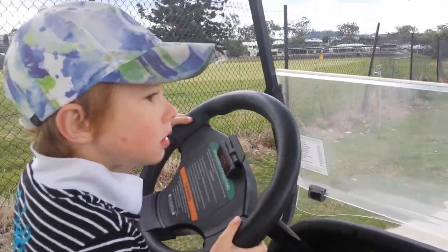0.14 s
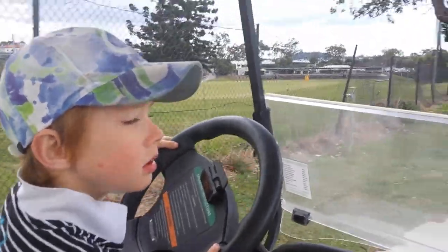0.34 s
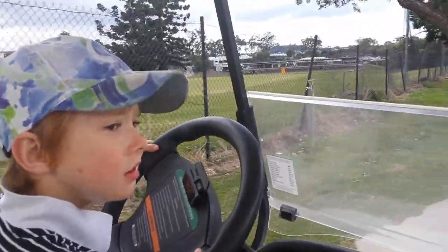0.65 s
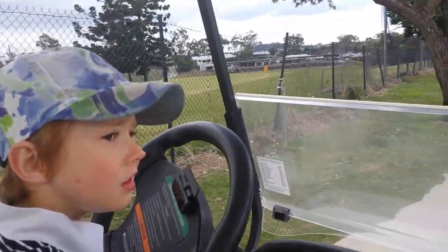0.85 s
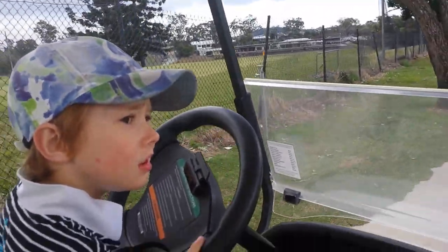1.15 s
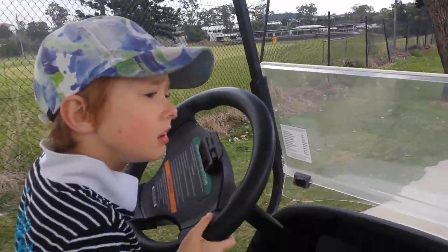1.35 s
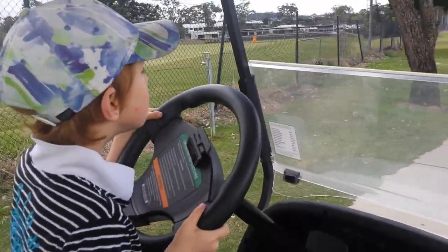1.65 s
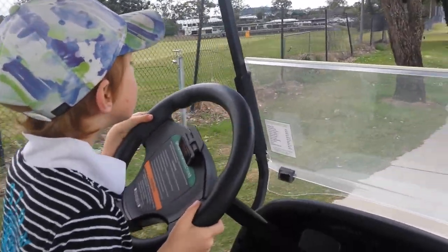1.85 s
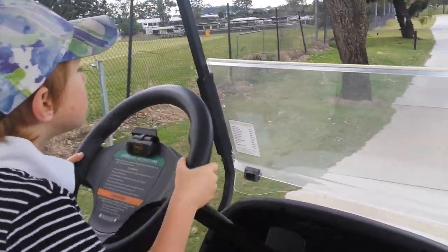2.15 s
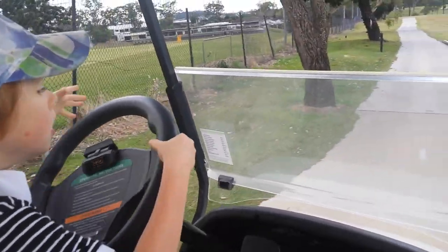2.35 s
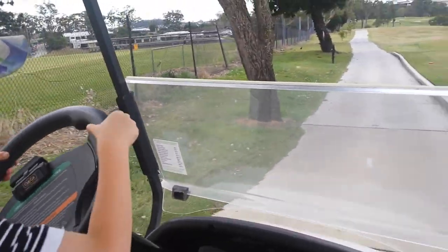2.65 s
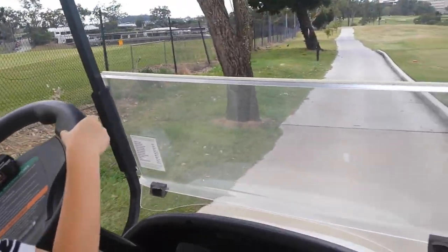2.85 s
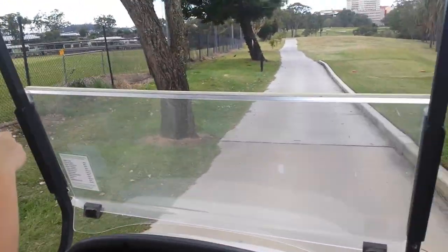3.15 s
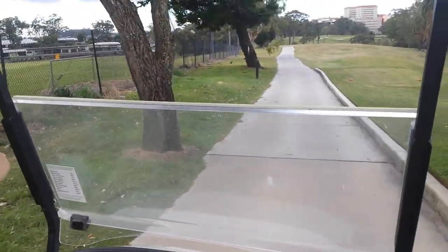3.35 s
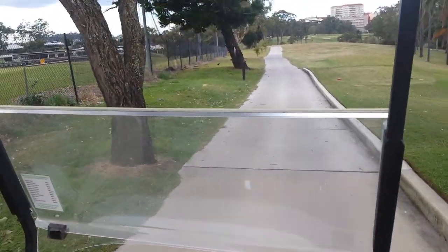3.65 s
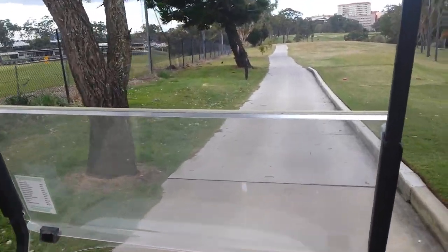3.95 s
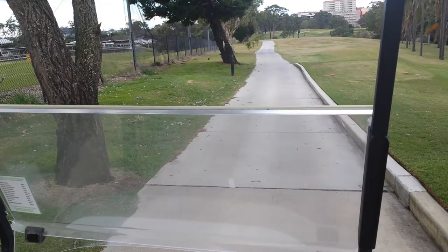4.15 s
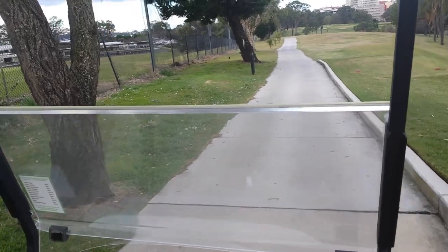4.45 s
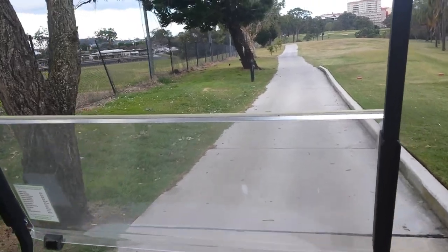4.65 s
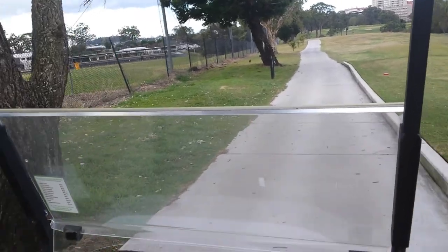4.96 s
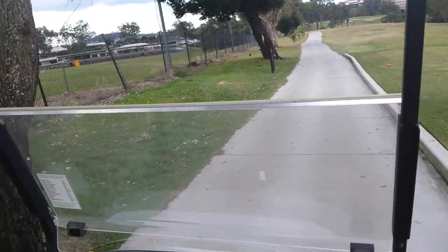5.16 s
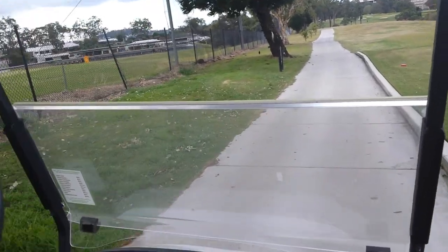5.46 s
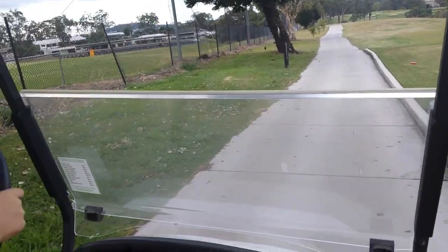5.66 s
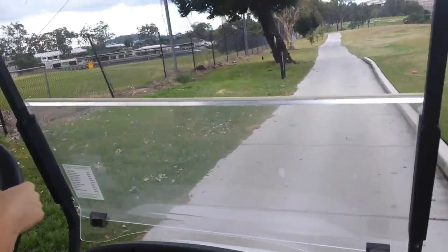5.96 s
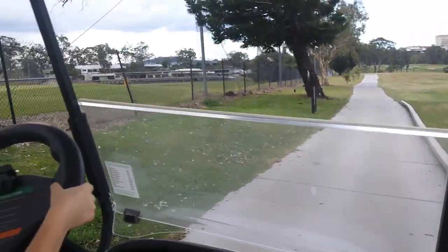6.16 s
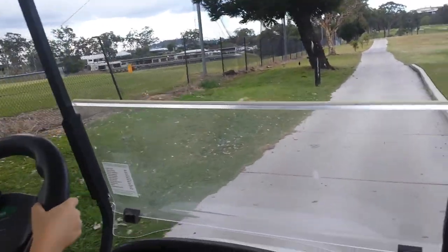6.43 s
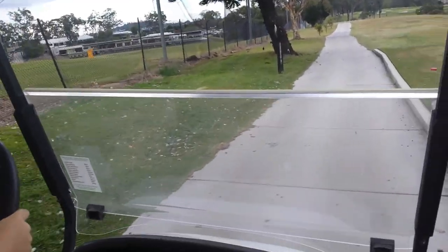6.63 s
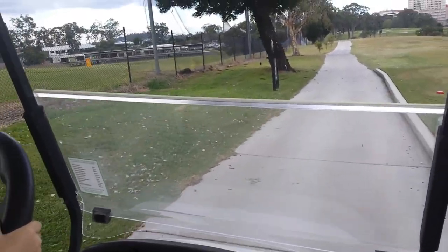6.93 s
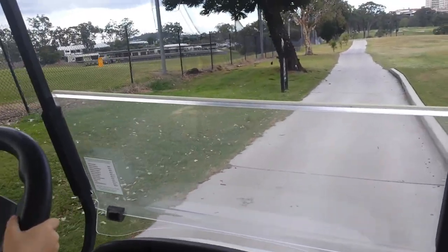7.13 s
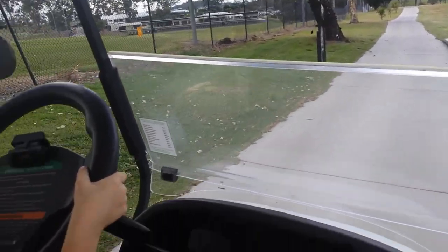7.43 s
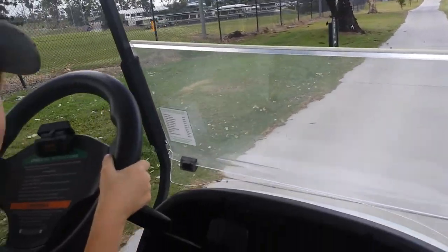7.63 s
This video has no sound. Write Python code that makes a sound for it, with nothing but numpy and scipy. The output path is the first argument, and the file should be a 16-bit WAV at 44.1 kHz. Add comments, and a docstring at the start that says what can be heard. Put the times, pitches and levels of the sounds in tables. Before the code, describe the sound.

A small golf cart rolls on a concrete path, heard from the seat outdoors. Low chassis rumble, light tyre hiss and a faint wavering whine continue throughout. From 0 to 2.1 s wind buffets heavily, mainly on the left, with blunt pops; a dry snap comes at 0.2 s, small clinks and a tiny squeak around 0.5 s, and woody panel knocks near 1.5 and 1.6 s. Around 2.5 to 2.7 s more knocks and a snap follow. A thin rubbing drive tone grows from 3 s, chirping at 4.2 and 4.7 to 4.9 s, between short gusts. It strengthens at 5.4 s. From 5.75 to 6.15 s the motor surges: quick dull beats climb into a hum, with louder hiss, ringing body, clinks and clatter. Sharp snaps land at 6.55 and 6.67 s. The motor then slows and eases, rumble remaining, with renewed wind around 7.2 to 7.5 s.

```python
"""On a concrete path, a small golf cart rolls along, heard from the seat.
Noise through low resonances makes the rumble, and noise bands make the hiss of tyres and drive.
Wavering tones make the whine of the drive, which also rubs in step with its turning; gusts buffet each microphone port.
Short blows make snaps, clinks and the knocks of a loose panel, and small trim squeaks.
A surge of the motor swells into a rising hum and makes small parts clatter."""
import sys
import numpy as np
from scipy import signal
from scipy.io import wavfile

SR = 44100
rng = np.random.default_rng(int(sys.argv[2]) if len(sys.argv) > 2 else 0)


def unload_audio(sound):
    """Save the sound as a 16-bit wav file, at the path given as the first command line argument."""
    columns = np.transpose(np.atleast_2d(sound))
    # keep every value between -1 and 1, then stretch to whole-number steps
    steps = np.round(np.clip(columns, -1, 1) * 32767)
    wavfile.write(sys.argv[1], SR, steps.astype(np.int16))


N = 343539  # length in samples
TIME = np.arange(N) / SR

# How strong the motor's beats are. Each row: time in seconds, level in dB.
BEAT_LEVELS = [(5.7, -27.5), (5.77, -9.5), (6.12, -11.5), (6.25, -20), (7, -28)]
# Resonances of the motor housing. Each row: pitch in Hz, width in Hz, relative level in dB.
HOUSING_MODES = [(1506, 28, 10), (1586, 23, 11), (1736, 65, 2), (3015, 26, 0.5)]
CHIRP_S = 0.023  # length of a chirp or squeak, in seconds at half height


def from_db(db):
    """Turn decibels into a gain."""
    return 10 ** (np.asarray(db) / 20)


def rms_one(x):
    """Scale a signal to unit power."""
    return x / np.sqrt(np.mean(x ** 2) + 1e-20)


def in_time(rows):
    """Read each column of a curve at every sample."""
    s, *columns = np.transpose(rows)
    return [np.interp(TIME, s, c) for c in columns]


def pan(left_db):
    """Gains of the two channels for a given left-minus-right level."""
    return from_db(np.array([[.5], [-.5]]) * left_db)


def drift(rate):
    """Smooth random curve of spread 1 that changes about rate times a second."""
    r = np.exp(-80 * np.pi * rate / SR)
    # one point every 40 samples; the first 2000 let the filter settle
    points = rng.standard_normal(N // 40 + 2002)
    slow = signal.lfilter([1], [1, -2 * r, r * r], points)[2000:]
    return np.interp(np.arange(N) / 40, np.arange(len(slow)), rms_one(slow))


def stereo_noise(alike):
    """White noise, partly shared by both channels."""
    share = np.clip(alike, 0, 1)
    common = np.sqrt(share) * rng.standard_normal(N)
    return common + np.sqrt(1 - share) * rng.standard_normal((2, N))


def bands(spectrum, alike):
    """Half-octave stereo bands (centre Hz, noise) that add up to a spectrum of unit power."""
    hz, level_db = np.transpose(spectrum)
    centres = 25 * 2 ** np.arange(0, 9.6, .5)
    centres = centres[(centres > hz[0] / np.sqrt(2)) & (centres < hz[-1] * np.sqrt(2))]
    gains = from_db(np.interp(np.log(centres), np.log(hz), level_db))
    # neighbouring bands take turns between two independent noises
    white = [stereo_noise(alike), stereo_noise(alike)]
    edges = np.sqrt(np.sqrt([.5, 2]))
    parts = []
    for k, (centre, gain) in enumerate(zip(centres, gains)):
        band = signal.butter(2, centre * edges, "band", fs=SR, output="sos")
        parts.append(gain * signal.sosfilt(band, white[k % 2]))
    total = np.std(sum(parts))
    return [(centre, part / total) for centre, part in zip(centres, parts)]


def resonate(force, modes):
    """Parallel resonances driven by a force, scaled to unit power; wider ones die sooner."""
    out = 0
    for k, (hz, width, db) in enumerate(modes):
        r = np.exp(-np.pi * width / SR)
        b = (1 - r * r) / 2 * np.array([1, 0, -1])
        a = [1, -2 * r * np.cos(2 * np.pi * hz / SR), r * r]
        out = out + (-1) ** k * from_db(db) * signal.lfilter(b, a, force)
    return rms_one(out)


def ring(clicks, hz, t60):
    """A unit click starts a sine of height 1 that fades by 60 dB in t60 seconds."""
    r = from_db(-60 / (t60 * SR))
    w = 2 * np.pi * hz / SR
    return signal.lfilter([0, np.sin(w)], [1, -2 * r * np.cos(w), r * r], clicks + 1e-18)


def contacts(times, strengths, chatter, chatter_s):
    """Each blow is one sharp contact and a dying chatter of smaller ones."""
    out = np.zeros((2, N))
    age = TIME[:SR // 10]
    for s, strength in zip(times, strengths):
        blow = chatter * rng.standard_normal((2, len(age))) * np.exp(-age / chatter_s)
        blow[:, 0] = 1
        at = round(s * SR)
        out[:, at:at + len(age)] += strength * blow[:, :N - at]
    return out


def suction(t, width_s):
    """Pressure under an eddy whose centre passes at t = 0: a dip between two rises."""
    across = (t / width_s) ** 2
    return (across - 1) * np.exp(-across / 2)


def swell(s, length_s, steepness):
    """A smooth rise to 1 at time s and back; length_s is its width at half height."""
    distance = np.minimum(np.abs(2 * (TIME - s) / length_s), 6)
    return np.exp(-distance ** steepness * np.log(2))


def from_left(x, left_db, lag_s):
    """A source on the left is louder there and reaches the right port later."""
    return np.array([x[0], np.interp(TIME - lag_s, TIME, x[1])]) * pan(left_db)


def tyres(rumble_db, boom_db, broad_db, jolt_db):
    """Bumps in the concrete shake the chassis, which booms on its low resonances."""
    # Tyres and chassis. Each row: pitch in Hz, width in Hz, relative level in dB.
    chassis = [(79.7, 20.6, 0.5), (113.5, 28.6, 0.5), (183, 31, -5.5), (251, 14.7, -3), (426.6, 73, -11.5)]
    # Spectrum of the rumble. Each row: pitch in Hz, relative level in dB per Hz.
    rumble = [(25, -3), (80, 15), (130, 4), (250, -4.5), (400, -7), (700, -5), (2500, -46)]
    boom = from_db(boom_db) * resonate(stereo_noise(alike=0.74), chassis)
    broad = from_db(broad_db) * sum(noise for hz, noise in bands(rumble, alike=0.72))
    dull = signal.butter(2, 900, fs=SR, output="sos")
    return (signal.sosfilt(dull, boom) + broad) * from_db(rumble_db + jolt_db * drift(3.5))


def motor(turns, lead_turns, lead_db, width_s, hum_db):
    """Two dull, nearly equal beats each turn set the motor bay humming; the hum climbs with the speed."""
    # The motor bay. Each row: pitch in Hz, width in Hz, relative level in dB.
    motor_bay = [(108, 18, 0), (445, 45, -6), (188, 16, -3.5)]
    # one beat whenever the count of whole turns goes up
    main, lead = (np.diff(np.floor(t), prepend=np.floor(t[0])) for t in (turns, turns + lead_turns))
    beats = main + from_db(lead_db) * lead
    puffs = signal.fftconvolve(beats, suction(TIME[:SR // 50] - .01, width_s), "same")
    dull = signal.butter(2, 1200, fs=SR, output="sos")
    hum = signal.sosfilt(dull, resonate(beats, motor_bay))
    return (puffs - from_db(hum_db) * hum) * from_db(in_time(BEAT_LEVELS)[0])


def hiss(hiss_db, grain_db, flutter_db, low_left_db, high_left_db):
    """Tyres and drive hiss together, unsteadily; the highest hiss comes from the open right side."""
    # Spectrum of the hiss. Each row: pitch in Hz, relative level in dB per Hz.
    hiss_spectrum = [(300, -8), (900, 14.5), (1300, 2.5), (2300, 5.5), (4200, -8.5), (6000, -12.5),
                     (8000, -8.5), (14000, -22.5)]
    grain = from_db(hiss_db + grain_db * drift(76))
    out = 0
    for hz, noise in bands(hiss_spectrum, alike=0.0089):
        side_db = np.interp(hz, [2000, 4000], [low_left_db, high_left_db])
        out = out + noise * pan(side_db) * from_db(flutter_db * drift(17.3))
    return grain * out


def body(body_db):
    """Road and gears, as one steady noise, keep the body ringing on its resonances."""
    # Roof, screen and axle housing. Each row: pitch in Hz, width in Hz, relative level in dB.
    body_modes = [(430, 230, 3.5), (622, 95, 6), (755, 22, 11.5), (848, 70, 10), (1650, 270, -0.5)]
    return resonate(stereo_noise(alike=0.75), body_modes) * from_db(body_db)


def gears(turns, load_db, waver, swell_db, throb, lag_rad):
    """Gear tones waver in pitch, shift with load, swell and fade, and throb once a turn."""
    # Whine of the gears. Each row: pitch in Hz, level in dB, dB gained per dB of load,
    # Hz gained per dB of load.
    whine = [(826, -43, -0.12, 0), (993, -43.5, -0.34, -0.5), (1069, -46, 0.0244, -1.5)]
    pace = 1 + waver * drift(2.062)
    out = 0
    for hz, db, db_per_load, hz_per_load in whine:
        angle = 2 * np.pi * np.cumsum((hz + hz_per_load * load_db) * pace) / SR
        # one swell shared by both sides, one for each side alone
        swelling = drift(37.0) + np.array([drift(11), drift(22)])
        gain = from_db(db + db_per_load * load_db + swell_db * swelling)
        out = out + gain * np.sin(angle + drift(12) - np.array([[0], [lag_rad]]))
    return out * (1 + throb * np.cos(2 * np.pi * turns))


def housing(turns, level_db, burst_db):
    """Small contacts crowd into a burst of strength once a turn and rattle the motor housing."""
    grains = (rng.random(N) < 900 / SR) * stereo_noise(alike=0.27)  # about 900 contacts a second
    force = grains * from_db(burst_db * np.cos(2 * np.pi * turns))
    return resonate(force, HOUSING_MODES) * from_db(level_db)


def drive(turns, level_db, twice_db):
    """A turning part rubs twice a turn, unevenly, and sings on one wavering pitch; now and then it catches."""
    # The part catches and chirps. Each row: middle in seconds, extra level in dB.
    chirps = [(4.21, 9), (4.51, -2), (4.73, 9), (4.805, -6), (4.88, 1), (5.405, -8)]
    rub_hz, jitter_rad = 2156, .85
    uneven_db = 3.5 * drift(22)
    pressure = from_db(twice_db * np.cos(4 * np.pi * turns) + uneven_db)
    catches = sum(from_db(db) * swell(s, CHIRP_S, 3.9) for s, db in chirps)
    wander = jitter_rad * drift(52) + 2 * drift(7)
    song = rms_one(np.sin(2 * np.pi * rub_hz * TIME + wander))
    return song * (rms_one(pressure) + catches) * from_db(level_db)


def clatter(effort_db, level_db, ring_db):
    """Loose parts jump and land unevenly, harder with effort: dry clacks that also ring the housing."""
    s, luck = rng.random((600, 2)).T
    s = s * TIME[-1]
    shaking_db = np.interp(s, TIME, effort_db + in_time(BEAT_LEVELS)[0])
    # cubing makes most landings weak and a few strong
    blows = contacts(s, luck ** 3 * from_db(shaking_db), chatter=0.38, chatter_s=0.0038)
    middle = signal.butter(1, [1400, 3500], "band", fs=SR, output="sos")
    clacks = rms_one(signal.sosfilt(middle, blows))
    return from_db(level_db) * (clacks + from_db(ring_db) * resonate(blows, HOUSING_MODES))


def airflow():
    """Buffeting in dB at each port: the powers of breeze and gusts add."""
    # The longer-lasting airflow. Each row: time in seconds, left level in dB, right level in dB.
    breeze = [(0, -14, -28), (.6, -13.5, -40), (.8, -18.5, -40), (1.2, -16.5, -25), (1.55, -11.5, -41),
              (2.05, -16, -29), (2.2, -28, -46), (4.7, -40, -25), (5.8, -55, -30), (6.17, -10.5, -31),
              (6.55, -18, -21), (6.66, -45, -30), (7.05, -30, -24), (7.2, -15.5, -16), (7.45, -11.5, -29),
              (7.52, -28, -25)]
    # Short gusts on top. Each row: middle in seconds, length in seconds, left level in dB,
    # right level in dB.
    gusts = [(0.177, 0.055, -12, -21), (2.68, 0.037, -20.5, -31.5), (2.824, 0.034, -15, -34),
             (3.085, 0.12, -16.5, -31), (3.363, 0.13, -17, -46), (3.496, 0.06, -16.5, -19),
             (4.339, 0.07, -13, -27), (4.801, 0.035, -23, -17), (4.914, 0.049, -14, -24),
             (5.053, 0.047, -37, -15.5), (5.721, 0.052, -13, -23), (6.24, 0.048, -29, -10),
             (6.424, 0.03, -13, -50), (6.777, 0.049, -16.5, -17.5), (7.086, 0.043, -29, -13.5),
             (7.741, 0.065, -38, -15.5)]
    power = from_db(in_time(breeze)) ** 2
    for s, length_s, left_db, right_db in gusts:
        peak = from_db([[left_db], [right_db]]) ** 2
        power = power + peak * swell(s, length_s, steepness=4.1)
    return 10 * np.log10(power)


def pops(gust_db, per_s, size_db, width_s):
    """The core of a passing eddy sucks briefly at the port, with overpressure before and after."""
    # Single strong eddies at the left port. Each row: middle in seconds, suction in dB,
    # half width in seconds.
    strong_eddies = [(0.295, 1, 0.0015), (.378, -3, .00045), (.526, -7, 0.00054), (3.284, -6.5, 0.00044),
                     (3.423, -5, 0.00051), (4.319, -2.5, 0.00065), (4.354, -3, 0.00083),
                     (4.365, 4.5, 0.0015), (5.723, -11, 0.00041), (6.401, -2, 0.00031),
                     (6.5034, 2.5, 0.00048), (6.725, -1, 0.0004), (7.333, -6, 0.00041)]
    cores = (rng.random((2, N)) < per_s / SR) * rng.random((2, N)) * from_db(gust_db + size_db)
    shape = suction(TIME[:SR // 50] - .01, width_s)
    out = signal.fftconvolve(cores, shape[None], "same", axes=1)
    for s, db, half_width_s in strong_eddies:
        out[0] += from_db(db) * suction(TIME - s, half_width_s)
    return out


def wind(level_db, eddy_db, brighten, pivot_hz, usual_db):
    """Eddies hit each port mostly separately; a stronger gust has smaller eddies and reaches higher."""
    # Spectrum of the buffeting. Each row: pitch in Hz, relative level in dB per Hz.
    buffet = [(25, -53), (50, -22.5), (90, -1), (150, 1), (250, -2), (600, -16), (1000, -57)]
    gust_db = airflow()
    churn_db = gust_db + eddy_db * np.array([drift(52.0), drift(93)])
    out = 0
    for hz, noise in bands(buffet, alike=0.15):
        tilt_db = brighten * np.log2(hz / pivot_hz) * (churn_db - usual_db)
        out = out + noise * from_db(churn_db + tilt_db)
    return from_db(level_db) * out + pops(gust_db, per_s=14, size_db=8.5, width_s=0.00077)


def snaps(level_db, left_db):
    """Hard plastic parts snap together: dry, dense snaps and their scatter off roof and screen."""
    # The snaps. Each row: start in seconds, relative strength in dB.
    snap_blows = [(.238, -12.5), (2.524, -16.5), (3.59, -22), (6.556, -8), (6.665, 1), (7.2, -22)]
    # Damped resonances of the parts. Each row: pitch in Hz, width in Hz, relative level in dB.
    snap_modes = [(2970, 900, 7), (4570, 730, 6.5), (6100, 770, 2), (12500, 2000, -0.5)]
    s, db = np.transpose(snap_blows)
    blows = contacts(s, from_db(db), chatter=0.45, chatter_s=0.00083)
    scatter = contacts(s, from_db(db), chatter=0.61, chatter_s=0.0094)
    bright = signal.butter(3, 2500, "high", fs=SR, output="sos")
    out = signal.sosfilt(bright, resonate(blows + scatter, snap_modes))
    return out * from_db(level_db) * pan(left_db)


def fittings(ring_db, crack_db, t60, left_db, click_db, click_width_hz):
    """Small hard parts snap together; hard blows ring them far more, most near the blow's brightest pitch."""
    # Loose fittings clink. Each row: start in seconds, strength in dB, brightest pitch in Hz.
    clinks = [(0.483, -24, 7840), (0.944, -22, 5860), (2.661, -24, 5000), (5.851, -29, 5800),
              (5.934, -21, 5960), (5.964, -16, 4450), (6.042, -9, 8800), (6.047, -8, 8200),
              (6.073, -12.5, 5040), (6.121, -10, 7100), (6.127, -9.5, 7200), (7.3, -21, 5700)]
    # Ringing pitches of the fittings. Each row: pitch in Hz, relative level in dB.
    fitting_modes = [(3000, -6), (4312, 1), (4613, -11), (5098, 0.5), (7289, -15), (8390, -10)]
    s, strength_db, bright_hz = np.transpose(clinks)
    luck_db = 2 * rng.standard_normal((len(s), len(fitting_modes)))
    out = 0
    for k, (hz, db) in enumerate(fitting_modes):
        # strength counts twice, so ringing grows faster than the blow
        blow_db = strength_db + (strength_db + 10.5) + db
        blow_db = blow_db - 2 * np.log2(hz / bright_hz) ** 2 + luck_db[:, k]
        blows = contacts(s, from_db(blow_db), chatter=0.045, chatter_s=0.015)
        out = out + (-1) ** k * ring(blows, hz, t60)
    # the contact is a short bright crack
    crack = contacts(s, from_db(strength_db), chatter=0.45, chatter_s=0.0055)
    # each part also clicks on a heavily damped resonance of its own
    for at, db, hz in clinks:
        blow = contacts([at], [from_db(db + click_db)], chatter=0.34, chatter_s=0.013)
        peak = signal.iirpeak(hz, hz / click_width_hz, fs=SR)
        crack = crack + signal.lfilter(*peak, blow + 1e-18)
    crack = signal.sosfilt(signal.butter(2, 2600, "high", fs=SR, output="sos"), crack)
    return (from_db(ring_db) * out + from_db(crack_db) * crack) * pan(left_db)


def squeaks(level_db, squeak_hz):
    """Plastic trim slips in tiny squeaks of unsteady pitch."""
    # The middle of each squeak in seconds.
    squeak_times = [.517, 2.153, 2.2]
    tone = np.sin(2 * np.pi * np.cumsum(squeak_hz * (1 + .02 * drift(60))) / SR)
    return tone * sum(swell(s, CHIRP_S, 2.3) for s in squeak_times) * from_db(level_db)


def panel(left_db, top_hz):
    """Dry, woody knocks of a loose plastic panel; the blunt contact leaves out the high treble."""
    # The knocks. Each row: start in seconds, strength in dB. The faint one at 6.404 s lands just after a strong
    # eddy's pop at the left port.
    knocks = [(1.474, -21.5), (1.631, -23.5), (2.6035, -22), (2.7275, -25), (6.404, -29), (6.421, -27)]
    # Ringing of the panel. Each row: pitch in Hz, relative level in dB, time to fade by 60 dB in seconds.
    panel_modes = [(280, 6, 0.03), (600, 10, 0.009), (1050, 7, 0.014), (1750, 5, 0.009),
                   (3100, 9.5, 0.0035)]
    s, strength_db = np.transpose(knocks)
    blows = contacts(s, from_db(strength_db), chatter=0.042, chatter_s=0.0089)
    rings = 0
    for k, (hz, db, t60) in enumerate(panel_modes):
        rings = rings + (-1) ** k * from_db(db) * ring(blows, hz, t60)
    return signal.sosfilt(signal.butter(8, top_hz, fs=SR, output="sos"), rings) * pan(left_db)


def scene():
    """The rolling cart and the wind: effort raises hiss and body ring, load raises rubbing and body ring."""
    # The ride. Each row: time in seconds, rumble in dB, effort of the motor in dB.
    road = [(0, -32, 0), (2.1, -30, 0), (3.9, -32.5, .5), (5.1, -29.5, 0.5), (5.8, -25, 3.5),
            (5.95, -20.5, 11), (6.15, -22.5, 11.5), (6.35, -22, 7), (7.3, -22.5, 2.5), (7.79, -24, 1.5)]
    # Load on the drive above its lightest running. Each row: time in seconds, load in dB.
    drive_load = [(0, 0), (2.6, 4.5), (2.9, 10), (3.5, 12.5), (4.5, 11), (5.25, 12.5), (5.42, 19.5),
                  (5.76, 18.5), (5.84, 12), (7.3, 5.5)]
    # Speed of the motor. Each row: time in seconds, turns per second.
    speed = [(5.25, 13.37), (5.75, 14.9), (6.13, 21.3), (6.5, 21), (7.3, 15)]
    rumble_db, effort_db = in_time(road)
    load_db, = in_time(drive_load)
    turns = np.cumsum(in_time(speed)[0]) / SR
    turns = turns - np.interp(5.799, TIME, turns)  # one main beat falls at 5.799 s
    late = turns - .16   # rubs and rattles follow each beat
    strain_db = effort_db + 0.16 * load_db

    rolling = tyres(rumble_db, boom_db=0.0, broad_db=-3.0, jolt_db=1.5)
    rolling = rolling + motor(turns, lead_turns=.32, lead_db=-0.5, width_s=0.0014, hum_db=-9.5)
    # the hiss grows louder as the motor works harder
    rolling = rolling + hiss(effort_db - 39, grain_db=1.0, flutter_db=1.76,
                             low_left_db=2.5, high_left_db=-7.5)
    machine = body(strain_db - 42.5)
    machine = machine + gears(turns, load_db, waver=0.005146, swell_db=3.5, throb=0.17, lag_rad=0.49)
    machine = machine + housing(late, strain_db - 47.5, burst_db=3.5)
    machine = machine + drive(late, load_db - 56.5, twice_db=5.5)
    machine = machine + clatter(effort_db, level_db=-53.5, ring_db=11)
    air = wind(level_db=-1.5, eddy_db=2.5, brighten=0.41, pivot_hz=223, usual_db=-12.5)
    rattles = snaps(level_db=-49.5, left_db=-7.0)
    rattles = rattles + fittings(ring_db=-22, crack_db=-8.0, t60=0.082, left_db=-7.5,
                                 click_db=10, click_width_hz=620)
    rattles = rattles + squeaks(level_db=-53, squeak_hz=5800) + panel(left_db=-1.0, top_hz=3540)
    return rolling + from_left(machine, left_db=3.5, lag_s=.00009) + air + rattles


def record(dry):
    """Each port's cavity lifts the treble and then rolls it off; peaks are rounded and the top is cut."""
    # The cavity behind each port, left first. Each row: resonance in Hz, sharpness Q (no unit),
    # roll-off in Hz.
    ports = [(6330, 6.1, 8800), (7430, 3.8, 13500)]
    out = []
    for channel, (hz, q, roll_hz) in zip(dry, ports):
        w = 2 * SR * np.tan(np.pi * hz / SR)
        cavity = signal.lfilter(*signal.bilinear([w * w], [1, w / q, w * w], SR), channel)
        out.append(signal.sosfilt(signal.butter(2, roll_hz, fs=SR, output="sos"), cavity))
    out = np.array(out)
    rounded = out / (1 + out ** 4) ** (1 / 4)
    return signal.sosfilt(signal.ellip(10, .1, 80, 14600, fs=SR, output="sos"), rounded)


dry = scene()
out = record(dry)
unload_audio(out)
```